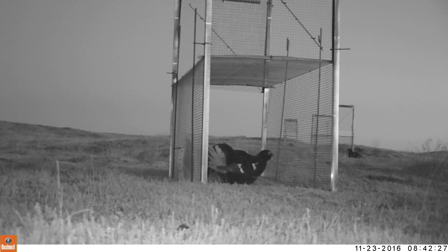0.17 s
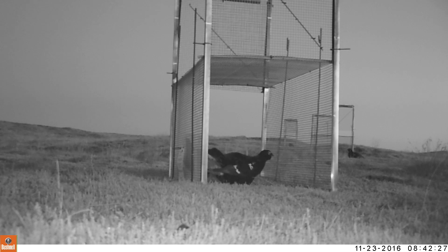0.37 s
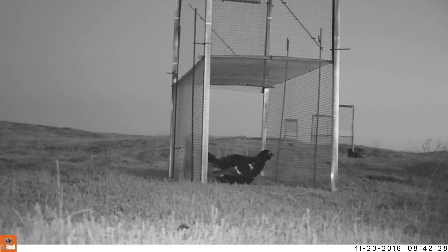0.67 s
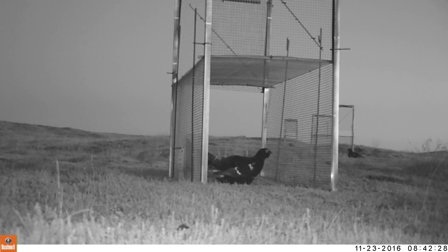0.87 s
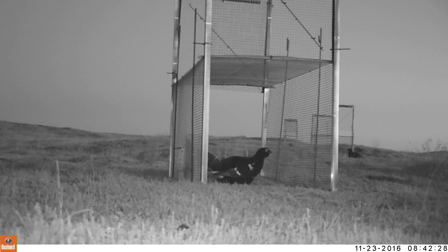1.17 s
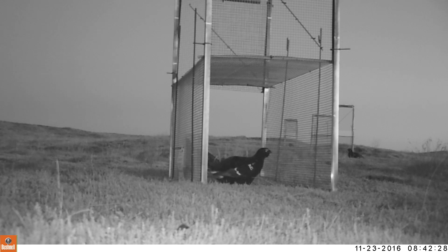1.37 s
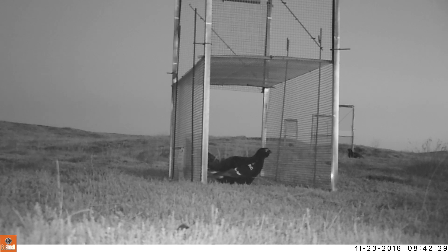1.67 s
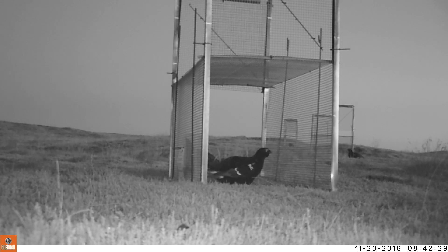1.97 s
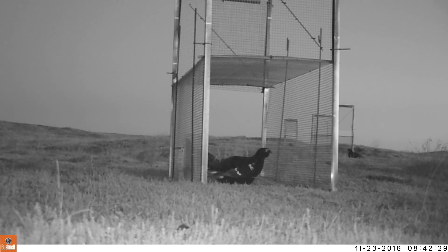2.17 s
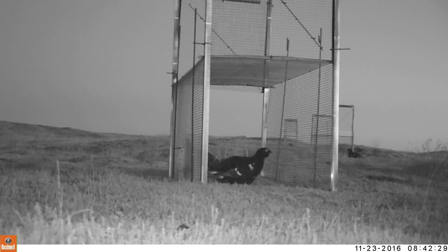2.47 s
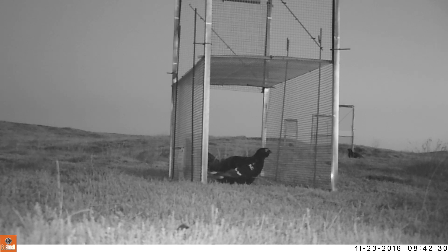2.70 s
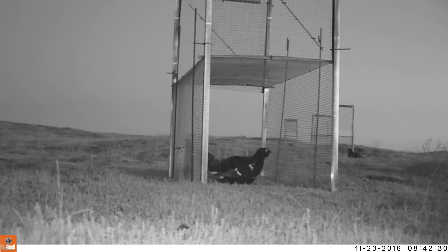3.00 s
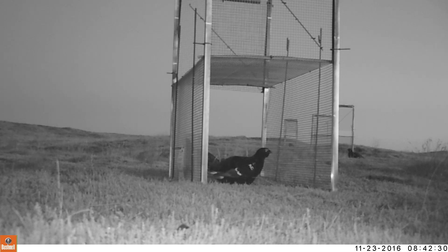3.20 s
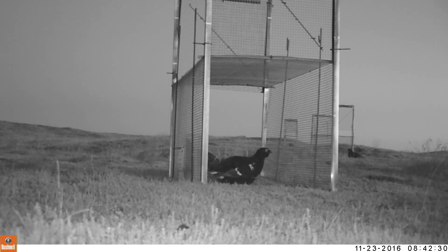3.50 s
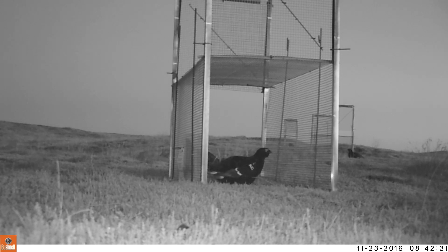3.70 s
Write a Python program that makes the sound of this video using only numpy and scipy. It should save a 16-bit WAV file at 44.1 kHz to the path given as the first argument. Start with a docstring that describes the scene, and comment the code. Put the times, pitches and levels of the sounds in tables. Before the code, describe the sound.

A black grouse gives soft bubbling hoots in groups of three, then pairs, gradually sinking, until about 2.6 seconds. A small bird then rattles twice, over low wind buffeting and faint hiss on an outdoor microphone.

```python
"""A low gust on the microphone dies away as a black grouse coos softly on open moorland.
The hoots are harmonic tones with arched pitch, in groups of three, then two, sinking in pitch.
A small bird gives thin sine notes, then two quick rattles of high ticks: downward sweeps through resonances.
Wind rumble and a faint rush of open air are filtered noise, as is the recorder's hiss."""
import sys
import numpy as np
from scipy import signal
from scipy.fft import rfft, irfft, next_fast_len
from scipy.io import wavfile

SR = 44100
rng = np.random.default_rng(int(sys.argv[2]) if len(sys.argv) > 2 else 0)


def pcm_store(signal):
    """Save signal as 16-bit PCM."""
    levels = np.round(np.clip(np.atleast_2d(signal), -1, 1) * 32767)
    wavfile.write(sys.argv[1], SR, levels.astype(np.int16).T)


N = 169785
TIME = np.arange(N) / SR   # s


def grouse():
    """Harmonic voice: fundamental, octave and third harmonic share one pitch that arches over a crest."""
    # hoots: (time of crest [s], crest pitch [Hz], fundamental level before onset and flutter [dB],
    # octave re fundamental [dB], swell half length [s], rise into the crest [share of pitch])
    hoots = [(0.049, 438, -68, -18, 0.018, 0.017), (0.164, 438.5, -63.5, -12, .022, .03),
             (.268, 454, -65, -14, 0.025, 0.018), (0.542, 477.7, -58, -14, 0.015, 0.15),
             (0.648, 433, -63.5, -9, .027, 0.011), (0.766, 456.4, -59.5, -17, 0.024, 0.03),
             (1.03, 484.3, -57, -12.5, 0.015, .12), (1.141, 437, -63, -16, 0.02, 0.021),
             (1.409, 466, -59.5, -11, .023, .1), (1.525, 421.5, -63.5, -5, 0.02, .02),
             (1.777, 447, -57, -13.5, 0.022, .07), (1.895, 410, -63.5, -7, .026, 0.018),
             (2.142, 441.6, -58.5, -10.5, 0.02, 0.059), (2.251, 407, -62.5, -8, 0.027, 0.025),
             (2.506, 432, -60, -11, 0.023, 0.052), (2.619, 399.5, -68.5, -3, 0.016, 0.03)]
    third_db = -13                        # third harmonic re the octave
    fall_share, deepest_sag = 0.12, 0.27  # pitch share lost about one half length after the crest; limit
    onset_s, attack_s = 0.023, 0.0027     # onset ahead of the crest; time scale of the attack
    overtone_lag_s = 0.0036               # the overtones swell a little after the fundamental
    pitch_waver, flutter_db = 0.0055, 1.1  # RMS unsteadiness: share of pitch, level
    echo_db, echo_t60_s = -26, 0.3        # reverberation of the moor

    out = np.zeros(N)
    waver = 1 + pitch_waver * drift(50)
    for crest_s, hz, db, octave_db, half_s, rise in hoots:
        near = np.abs(TIME - crest_s) < 0.1
        t = TIME[near] - crest_s

        # parabolic arch, flattened by tanh far from the crest
        bend = np.where(t < 0, rise, fall_share)
        sag = deepest_sag * np.tanh(bend * (t / half_s) ** 2 / deepest_sag)
        phase = phase_of(hz * (1 - sag) * waver[near])

        fundamental = hoot_swell(t, half_s) * np.sin(phase)
        overtones = np.sin(2 * phase) + from_db(third_db) * np.sin(3 * phase)
        overtones = from_db(octave_db) * hoot_swell(t - overtone_lag_s, half_s) * overtones
        onset = (1 + np.tanh((t + onset_s) / attack_s)) / 2
        out[near] += np.sqrt(2) * from_db(db) * onset * (fundamental + overtones)

    out = out * from_db(flutter_db * drift(36))
    return out + from_db(echo_db) * scattered(out, echo_t60_s)


def hoot_swell(t, half_s):
    """Bell-shaped amplitude envelope: 1 at its top, 7 dB down one half length to either side."""
    return 1 / (1 + (t / half_s) ** 2 / 2) ** 2


def small_bird():
    """Frequency modulation and scattering: raspy ticks and thin wavering notes, both slightly smeared."""
    scatter_db, scatter_t60_s = -2, 0.03   # reflections from grass and netting
    unsteady = drift(1400)                 # one unsteadiness for ticks and notes
    out = ticks(unsteady) + thin_notes(unsteady)
    return out + from_db(scatter_db) * scattered(out, scatter_t60_s)


def ticks(unsteady):
    """Source and filter: each fast downward sweep passes direct and through parallel resonances."""
    # ticks: (start time [s], sweep level before the resonances [dB], starting pitch [Hz])
    tick_table = [(2.735, -64.5, 8300), (2.7595, -59.5, 8330), (2.792, -65, 8160), (2.845, -75, 8500),
                  (2.877, -71.5, 7400), (3.4316, -67.5, 8650), (3.459, -67, 8450), (3.493, -69, 8600),
                  (3.533, -67.5, 7340), (3.571, -69.5, 7570)]
    # resonances that colour every tick: (centre [Hz], width [Hz], gain [dB])
    tick_resonances = [(6080, 170, 2.5), (7070, 290, -5.5), (7730, 220, -3), (8250, 400, -9)]
    tick_s, fall_hz, rasp_hz = 0.0075, 2550, 660   # length, fall over that length, RMS pitch roughness
    direct_db = -9                                 # share that bypasses the resonances

    sweeps = np.zeros(N)
    for start_s, db, hz in tick_table:
        near = (TIME > start_s) & (TIME < start_s + tick_s)
        progress = (TIME[near] - start_s) / tick_s
        pitch = hz - fall_hz * progress + rasp_hz * unsteady[near]
        envelope = np.sin(np.pi * progress)
        sweeps[near] += np.sqrt(2) * from_db(db) * envelope * np.sin(phase_of(pitch))

    out = from_db(direct_db) * sweeps
    for hz, width_hz, gain_db in tick_resonances:
        out += from_db(gain_db) * resonance(sweeps, hz, width_hz)
    return out


def thin_notes(unsteady):
    """Frequency-modulated sines under Gaussian envelopes."""
    # notes: (time of middle [s], Gaussian half length [s], mean pitch [Hz], peak level before scatter [dB])
    note_table = [(.195, 0.011, 7120, -75), (0.295, 0.046, 7080, -83)]
    waver_hz = 320   # RMS

    out = np.zeros(N)
    for middle_s, half_s, hz, db in note_table:
        swell = np.exp(-((TIME - middle_s) / half_s) ** 2 / 2)
        out += from_db(db) * swell * np.sin(phase_of(hz + waver_hz * unsteady))
    return out


def wind_buffet():
    """Wind noise on the microphone: low-frequency noise whose level follows the gusts."""
    # gusts: (time [s], level before the overall gain [dB])
    gusts = [(0, -38.5), (.34, -53.5), (.48, -60), (1.0, -57.5), (2.2, -57.5), (3.1, -60.5), (3.3, -49.5),
             (3.7, -46.5), (3.85, -53.5)]
    # colour of the buffeting: (frequency [Hz], relative density [dB per Hz])
    buffet_colour = [(8, 2.5), (17, -6), (26, 0), (40, -14), (70, -23.5), (120, -29), (300, -42.5),
                     (1000, -65), (8000, -120)]
    gain_db, lumps_db = 2.5, 0.6   # overall gain; RMS of the irregular level

    gust_db = np.interp(TIME, *np.transpose(gusts))
    level_db = gain_db + gust_db + lumps_db * drift(11)
    return from_db(level_db) * coloured_noise(buffet_colour)


def open_air():
    """Broadband ambient noise: a faint rush whose level flickers slightly."""
    # colour of the rush: (frequency [Hz], relative density [dB per Hz])
    air_colour = [(30, 1), (70, 1), (130, -5), (250, -10.5), (400, -16), (650, -20), (900, -19.5),
                  (1400, -29), (2500, -35.5), (6000, -47), (14000, -75)]
    level_db, flicker_db = -58.5, 0.3   # mean level; RMS flicker
    return from_db(level_db + flicker_db * drift(5.8)) * coloured_noise(air_colour)


def from_db(db):
    """Logarithmic level to linear amplitude gain."""
    return 10 ** (np.asarray(db) / 20)


def rms_one(x):
    """Power normalisation: scale to unit RMS."""
    return x / np.sqrt(np.mean(x ** 2) + 1e-20)


def drift(rate_hz):
    """Low-pass random process: noise through two equal poles gives a wander of unit RMS."""
    r = np.exp(-2 * np.pi * rate_hz / SR)
    noise = rng.standard_normal(N + SR)
    wander = signal.lfilter([1], [1, -2 * r, r * r], noise)
    return rms_one(wander[SR:])   # the first second lets the filter settle


def coloured_noise(spectrum):
    """Spectral shaping: unit-RMS noise of the given colour, fading out below its lowest point."""
    hz, db = np.transpose(spectrum)
    size = next_fast_len(N)
    f = np.maximum(np.arange(size // 2 + 1) * SR / size, 1e-3)
    gain = from_db(np.interp(np.log(f), np.log(hz), db))
    gain = gain * np.minimum(f / hz[0], 1) ** 2
    white = rfft(rng.standard_normal(size))
    return rms_one(irfft(white * gain, size)[:N])


def phase_of(hz):
    """Phase is the running integral of frequency."""
    return 2 * np.pi * np.cumsum(hz) / SR


def scattered(x, t60_s):
    """Diffuse reverberation: convolution with exponentially decaying noise of unit energy."""
    decay = from_db(-60 * TIME[:SR // 2] / t60_s)
    tail = rng.standard_normal(SR // 2) * decay
    return signal.fftconvolve(x, tail / np.sqrt(np.sum(tail ** 2)))[:N]


def resonance(x, hz, width_hz):
    """Damped resonator: a pole pair sets pitch and width, with about unit gain at the top."""
    r = np.exp(-np.pi * width_hz / SR)
    zeros = np.array([1, 0, -1]) * (1 - r * r) / 2
    poles = [1, -2 * r * np.cos(2 * np.pi * hz / SR), r * r]
    return signal.lfilter(zeros, poles, x + 1e-18)   # the offset avoids denormal numbers


def scene():
    """Superposition: both birds and the wind add at one microphone."""
    return (grouse() + small_bird() + wind_buffet() + open_air())[None]


def record(dry):
    """Recorder noise and band limit: hiss is added, then a steep low-pass cuts the top."""
    # colour of the hiss: (frequency [Hz], relative density [dB per Hz])
    hiss_colour = [(500, -2.5), (2000, 1.5), (4000, 1.5), (6000, 0), (9000, -1), (12000, -1.5), (14000, -3)]
    hiss_db, cutoff_hz = -75.5, 13950   # hiss level ahead of the low-pass
    noisy = dry + from_db(hiss_db) * coloured_noise(hiss_colour)
    low_pass = signal.ellip(12, 0.1, 70, cutoff_hz, fs=SR, output="sos")
    return signal.sosfilt(low_pass, noisy)


dry = scene()
out = record(dry)
pcm_store(out)
```